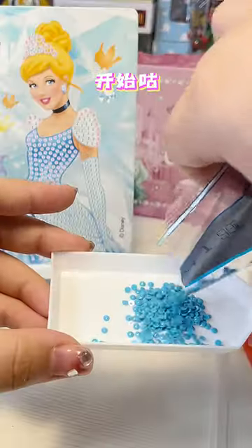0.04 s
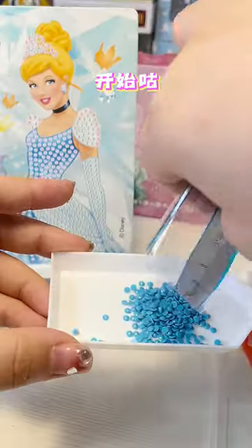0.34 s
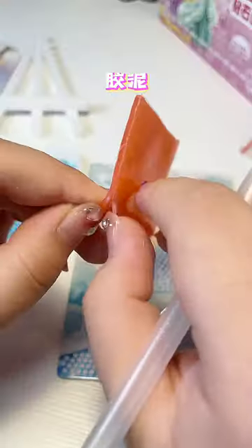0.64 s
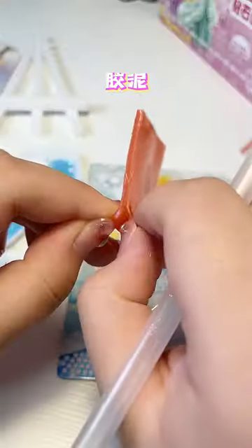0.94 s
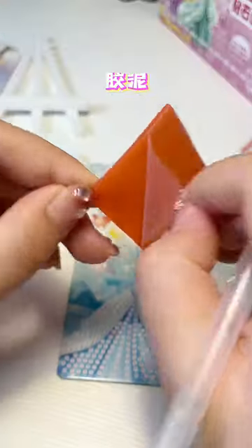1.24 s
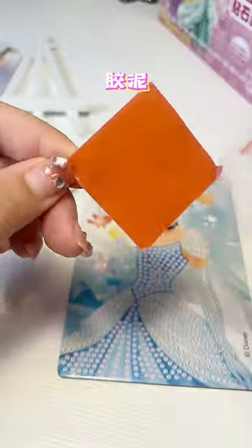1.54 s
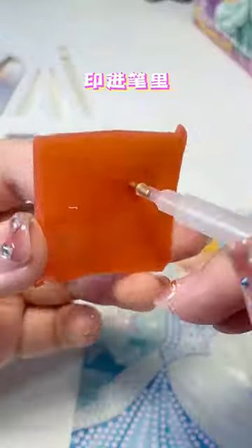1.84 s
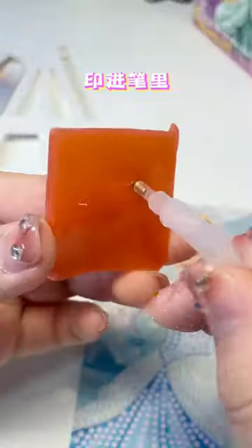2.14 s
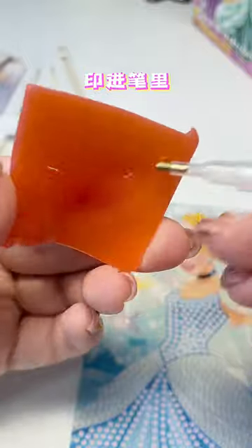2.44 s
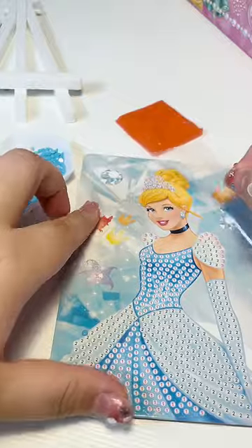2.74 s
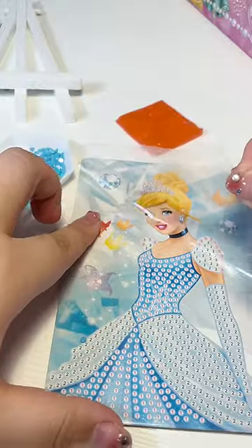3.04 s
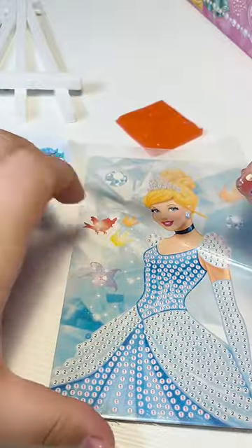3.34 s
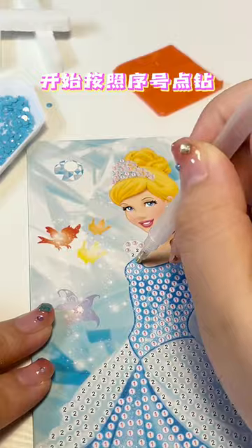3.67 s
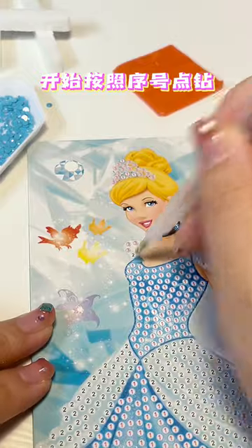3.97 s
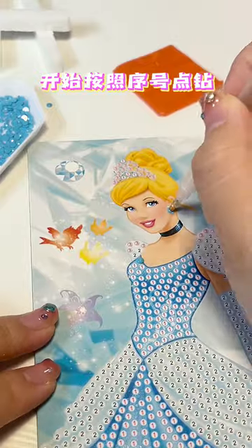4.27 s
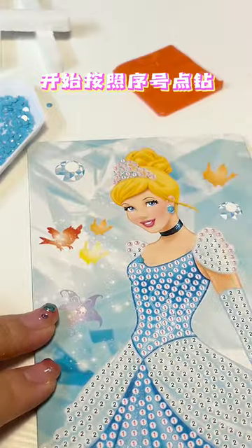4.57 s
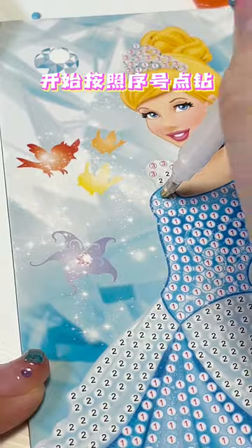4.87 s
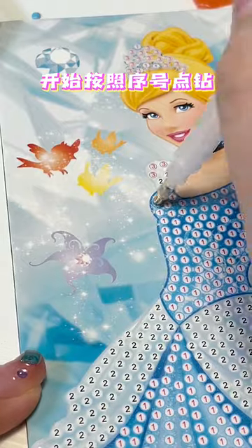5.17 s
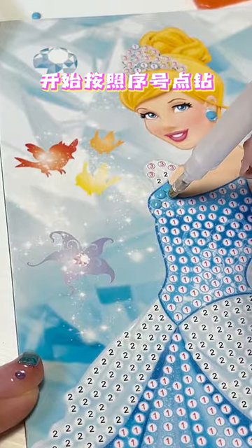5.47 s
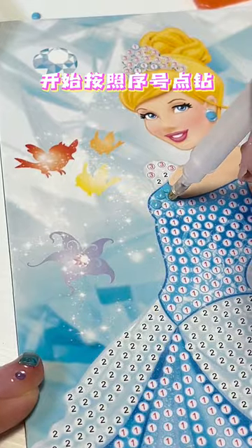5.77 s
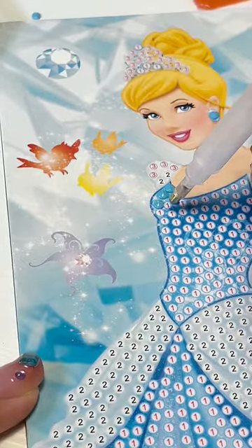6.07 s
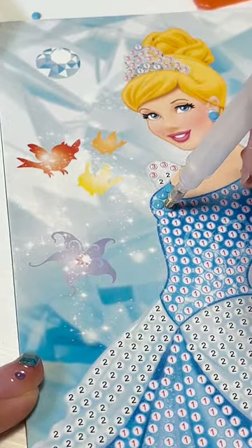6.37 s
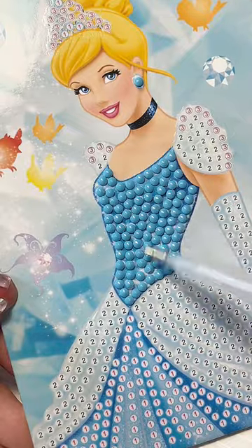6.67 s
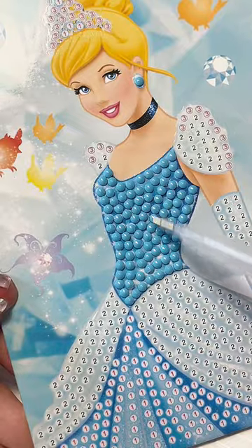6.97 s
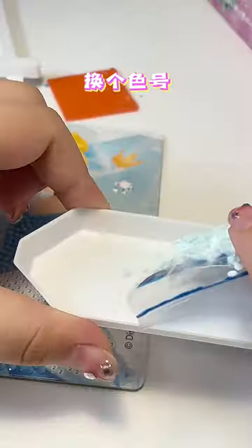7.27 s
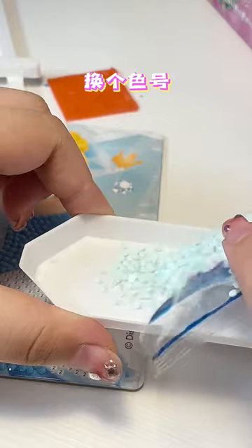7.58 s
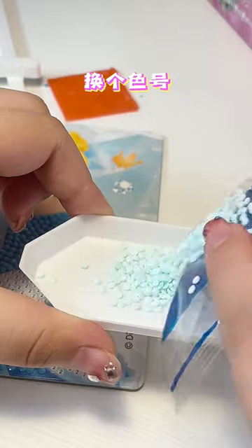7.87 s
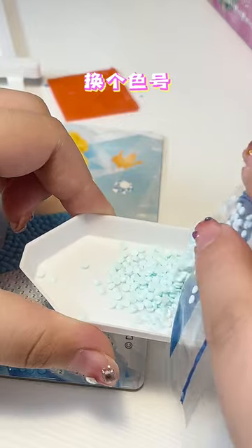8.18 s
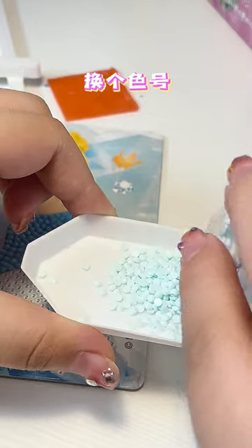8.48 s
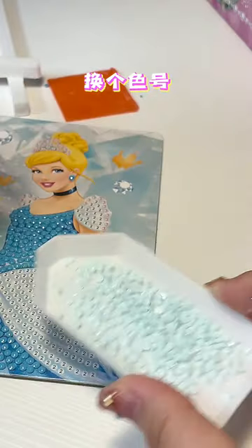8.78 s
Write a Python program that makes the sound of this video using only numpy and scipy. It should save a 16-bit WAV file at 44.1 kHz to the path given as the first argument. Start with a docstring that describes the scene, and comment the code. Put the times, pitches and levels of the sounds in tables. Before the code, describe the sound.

In the first half second a plastic bag slides and rustles off a small plastic tray, which gives a few sharp clicks. Fingernails tick faintly on thin film at about 0.6 seconds and again around 1.5. From 2.6 to 3.4 seconds a cover film peels off a sticky card in crackling snaps, with a soft thump of a hand on the desk. Between 3.9 and 5.9 seconds a pen picks up rhinestones with light, separate clicks. From 6.5 to 7.2 it knocks over the set stones in three quick, hollow strokes. Tiny stones then pour from a rustling bag into the tray in bright, pattering surges, with sharp clicks near 7.5 and 8.4 seconds. From 8.6 to 9 the tray is shaken and the stones rattle level. Everything is close to the microphone, over a small room's low rumble and a faint hum from about 2 seconds.

```python
"""Rhinestones click, pour from a plastic bag and are shaken level, ringing a small plastic tray. Diamond
painting at a desk, close to a phone. First the bag slides off the clicking tray, nails tick on a wax pad's
film, and cover film snaps off a sticky card. A pen picks stones, then skips across the set ones in three quick
strokes; the pour and shake come last. A small room rumbles and hums underneath."""
import sys
import numpy as np
from scipy import signal
from scipy.fft import rfft, irfft, next_fast_len
from scipy.io import wavfile
from scipy.ndimage import uniform_filter1d, minimum_filter1d

SR = 44100
rng = np.random.default_rng(int(sys.argv[2]) if len(sys.argv) > 2 else 0)


def dump(signal):
    """Clip the signal to [-1, 1] and save it as 16-bit WAV at the path in sys.argv[1]."""
    limited = np.clip(np.atleast_2d(signal).T, -1, 1)
    pcm = np.round(limited * 32767).astype(np.int16)
    wavfile.write(sys.argv[1], SR, pcm)


N = 397782
TIME_S = np.arange(N) / SR
HIT_TIME_S = TIME_S[:4096]
SIDE_SIGN = np.array([[1], [-1]])  # left, right

# Levels are relative within each layer.
# surges from the bag, shakes of the tray: t/s, length/s, stone level/dB, tray level/dB
POUR_SURGES = [(7.2, 0.43, -34.5, -25.5), (7.272, 0.096, -36, -25), (7.5, 0.079, -32.5, -23.5),
               (7.67, 0.15, -37, -36.5), (7.84, 0.23, -40, -40.5), (7.99, 0.16, -35.5, -37),
               (8.07, 0.044, -34.5, -45), (8.2, 0.18, -47.5, -42.5), (8.54, 0.0081, -40.5, -39)]
SHAKE_STROKES = [(8.64, 0.13, -31.5, -23), (8.715, 0.023, -34.5, -23.5), (8.8, 0.15, -33, -28.5),
                 (8.99, 0.034, -31.5, -34.5)]
# tray modes: f/Hz, t60/s, falling-stone level/dB, sliding-stone level/dB
TRAY_RESONANCES = [(2254, 0.03, -6.5, -3), (2467, 0.016, 5, 3), (2682, 0.024, 1, 4), (2900, .03, 1, 0.5),
                   (3122, 0.0099, 4, -2.5), (3810, 0.017, 0.5, -1), (5250, .045, -8, -3),
                   (5870, 0.021, 0.5, 0), (6500, 0.011, -13, -5.5)]
# desk, card and pen tip or nail modes: f/Hz, t60/s, level/dB
DESK_RESONANCES = [(231, 0.03, -12.5), (605, 0.025, -23), (1115, 0.0058, 12.5), (1380, 0.004, 5.5),
                   (2170, 0.011, -2), (3496, .012, -15.5)]
CARD_RESONANCES = [(420, 0.024, 13), (615, 0.015, 6), (840, 0.041, -1), (1335, 0.038, 6),
                   (1930, 0.088, 1.5), (2450, 0.03, -1.5), (3010, 0.026, 10), (5240, .018, -1.5),
                   (6570, .018, 6)]
TIP_RESONANCES = [(3330, 0.01, -3), (3690, 0.06, -7), (5380, 0.028, -4.5), (6320, 0.01, 2.5),
                  (8600, 0.008, 4.5)]
# hits on the tray, nails on film, pen picking stones: t/s, level/dB, tilt/(dB/oct), spot f/Hz
TRAY_HITS = [(.1515, -14, -8, 1900), (.2037, 6, 0, 5600), (.2124, -13, 3, 2210), (.2575, -29, -10, 3400),
             (.2644, 4, 0.5, 5600), (.3708, -1, 5, 12900), (.446, -26.5, -4, 2400),
             (7.2505, -12.5, 16, 2905), (7.4343, -24, -1, 3070), (7.4892, -25, 14, 5750),
             (7.994, -34, 0, 2400), (8.3452, -23, -1, 2850), (8.3662, -25, 0, 2730),
             (8.4303, -13.5, -2.5, 4620), (8.4463, 14, 3.5, 3100), (8.4557, -7, -1.5, 4330)]
NAIL_TICKS = [(.6248, -38, -3.5, 6040), (.6301, -43, -7, 2100), (1.3621, -19.5, 5, 13000),
              (1.453, -27, 7, 13500), (1.577, -32.5, -5, 2190), (1.5901, -41, -4.5, 1520),
              (1.6357, -42, 14, 8400)]
PEN_PICKS = [(3.9424, -8.5, -1.5, 7970), (4.4658, -6, -2, 3850), (4.4992, -19, 7, 14000),
             (5.0266, -18.5, 2.5, 3200), (5.3462, -11, 0.5, 8960), (5.8922, -21.5, 2, 8270)]
# pen on set stones: t/s, level/dB
PEN_KNOCKS = [(6.543, 5.5), (6.5659, 1.5), (6.602, -20.5), (6.754, -9), (6.767, -8.5), (6.778, -6.5),
              (6.7998, 5.5), (6.803, 6), (6.819, 1), (6.832, 6), (6.836, -2.5), (6.8499, -0.5),
              (6.8669, -1.5), (6.8745, -4), (6.8844, -12), (7.047, -8), (7.0785, -5.5), (7.0931, -9.5),
              (7.1, 3), (7.106, -6), (7.1161, 3.5), (7.1217, -4), (7.13, 3.5), (7.1415, -5.5),
              (7.161, -2.5)]
# film lets go of the glue: t/s, level/dB, tilt/(dB/oct), t60/s
FILM_SNAPS = [(2.7233, -17.5, -2.5, 0.046), (2.8, -24, -9, 0.076), (2.8833, -17.5, -4, 0.053),
              (2.9628, -21, 10.5, 0.013), (2.9831, 1.5, 6.5, 0.0029), (2.9967, -10.5, 10, 0.013),
              (2.997, -5.5, -3.5, 0.02), (3.004, -2.5, -4, 0.013), (3.0174, -14, -4, 0.023),
              (3.075, -27.5, 9.5, 0.016), (3.139, -5, 3, 0.021), (3.1434, -9, -4, 0.029),
              (3.161, -16.5, -10.5, 0.028), (3.2774, -5, -3, 0.013), (3.281, 5.5, 1, 0.029),
              (3.285, -20, 6.5, 0.06), (3.2899, -9.5, -12.5, 0.017), (3.398, -26.5, -4.5, 0.092)]
# rustling moves: t/s, length/s, level/dB
BAG_SLIPS = [(0, 0.45, -35.5), (.35, 0.073, -47)]
BAG_ROLLS = [(7.29, 0.67, -39), (7.631, 0.007, -26.5), (7.96, 0.27, -35), (8.38, 0.14, -48.5)]  # stones inside the tipped bag
FILM_PULLS = [(2.612, 0.035, -45), (2.72, 0.11, -52), (2.879, 0.022, -35.5), (2.96, 0.14, -48),
              (3.11, 0.071, -44.5), (3.262, 0.039, -39.5)]
GLUE_PEELS = [(2.883, 0.019, -29.5), (2.92, 0.04, -45), (3.19, 0.076, -50.5)]
FINGER_RUBS = [(1.08, 0.29, -78.5), (1.36, 0.26, -72), (4.83, 0.072, -73)]
PEN_STIRS = [(3.945, 0.038, -46.5), (4.47, 0.038, -42.5), (5.03, 0.0614, -55), (5.35, 0.011, -55.5),
             (5.895, 0.02, -61)]
# hand and bag bump card and tray: t/s, level/dB
SOFT_BUMPS = [(4.4, -34), (4.495, -29.5), (5.026, -31), (7.634, -16)]
# hand lands on the desk: t/s, f/Hz, t60/s, level/dB
HAND_THUMPS = [(2.735, 108, .12, -19)]
# source spectra: f/Hz, level/dB
POUR_SPECTRUM = [(200, -34.5), (700, -17.5), (1400, -9), (2200, 6.5), (3300, 6.5), (4600, 2), (6000, 5),
                 (8000, 12.5), (10500, 7.5), (13000, 9.5), (15500, 7)]
SHAKE_SPECTRUM = [(200, -24), (1000, -21.5), (2400, -2.5), (3500, 6.5), (4700, 1.5), (6500, 4),
                  (8500, 10.5), (10500, 4), (12500, 9), (15500, 6)]
TRAY_SPECTRUM = [(150, -50.5), (700, -12.5), (1500, -11.5), (2300, -3.5), (4200, -7), (6000, -10.5),
                 (8200, -0.5), (10000, -7.5), (12500, -6), (15600, -13)]
NAIL_SPECTRUM = [(150, -26.5), (1500, -10.5), (3400, -14), (8000, 1), (10500, 10), (14500, 1), (16000, -13)]
PICK_SPECTRUM = [(150, -35), (700, -4.5), (1500, -8), (2800, -3.5), (3700, -8), (6000, -0.5), (9000, 13),
                 (12500, 5.5), (15500, -13)]
KNOCK_SPECTRUM = [(300, -5), (2000, 15), (4000, 3.5), (7500, 5.5), (12000, 8.5), (15600, -14)]
SNAP_SPECTRUM = [(80, -8.5), (280, -12.5), (420, -2.5), (1400, 3), (2500, 3), (3400, -6), (7500, -6),
                 (9000, -14.5), (12000, -17.5), (15600, -19.5)]
BAG_SPECTRUM = [(200, -10.5), (1600, -10.5), (2100, -5), (3600, -7.5), (8500, 0), (11500, -4),
                (14500, -0.5), (16000, -5.5)]
ROLL_SPECTRUM = [(300, -15), (800, 4.5), (2100, 12.5), (4300, 10.5), (6200, 12.5), (10500, 13),
                 (15000, 7.5)]
FILM_SPECTRUM = [(200, -6.5), (800, 5), (1600, -2), (4000, -2.5), (5800, -3), (11000, -1.5), (14500, -9),
                 (16000, -14)]
RUB_SPECTRUM = [(1000, 2.5), (6000, -1.5), (13000, 9.5), (16000, -1)]
STIR_SPECTRUM = [(300, 4.5), (1600, 0.5), (4600, -1), (13000, 2.5), (16000, -2)]
BUMP_SPECTRUM = [(200, -7), (750, 9.5), (1200, -1.5), (2500, -12), (6000, -52)]
SCATTER_SPECTRUM = [(200, -17.5), (700, 9.5), (2400, -36.5), (4700, 8), (5600, -1.5), (8000, -10.5),
                    (15000, -9)]
RUMBLE_SPECTRUM = [(31, -34.5), (43, 6), (58, -4.5), (76, -5), (95, -3.5), (115, -7.5), (150, -14),
                   (230, -14), (320, -18), (400, -19), (650, -35), (2700, -50), (15000, -53)]
# rumble drift: t/s, level/dB
RUMBLE_DRIFT = [(0.0, -41), (0.7, -43), (3.11, -38.5), (6.33, -40.5), (6.83, -37.5), (9.02, -39)]
# low hum: onset t/s, f/Hz, level/dB
HUM_TONE = (1.95, 113, -42.5)
# phase between microphone ports: f/Hz, left lead/rad
PORT_LEAD = [(20, 0), (4000, 0), (6000, .3), (8000, 2.1), (8800, 3.1), (11500, 3.2), (12700, 4.7),
             (14000, 6), (16000, 6.3)]
# brief level dips: t/s, length/s, level/dB
LEVEL_DIPS = [(6.519, .019, -40), (7.192, .008, -40)]


def stones(gains, spectrum, modes, rate_per_s, spread_db, clump_db, stone_db, tray_db):
    """Resin stones tick against each other; those reaching the tray floor ring it."""
    stone_gain, tray_gain = gains
    impacts = grains(rate_per_s, spread_db, clump_db)
    ticks = band_norm(convolve(chatter(impacts, t60_s=0.004), colour(spectrum)))
    tray = 0
    for mode in modes:
        drive = impacts * rng.standard_normal(N)  # each landing spot drives the mode differently
        tray = tray + undb(mode[2]) * convolve(drive, ring([mode], detune=0.005))
    tray = butter(tray, 2, 1900, "high")  # a small tray radiates no lows
    return undb(stone_db) * stone_gain * ticks + undb(tray_db) * tray_gain * band_norm(tray, (2300, 3300))


def chatter(impacts, t60_s):
    """Each impact dies in a fizz of tiny rebounds."""
    energy = signal.lfilter([1], [1, -undb(-120 / (t60_s * SR))], impacts ** 2 + 1e-18)
    return np.sqrt(energy) * rng.standard_normal(N)


def clicks(rows, spectrum, modes, t60_s, ring_db, gain_db, spot_db=-9):
    """Hard contacts on thin plastic: crack, rattle, ring and the struck spot's pitch."""
    out = np.zeros(N)
    for t_s, level_db, tilt_db_per_oct, spot_hz in rows:
        body = colour(spectrum, tilt_db_per_oct)
        push = contact(t60_s, rise_s=0.000053)
        rattle = undb(-17) * burst(t60_s=0.016)
        crack = unit(convolve(push + rattle, body))
        spot = ring([(spot_hz, 0.006, 0)], detune=0.0039)
        ringing = unit(convolve(crack, ring(modes, detune=0.011)))
        add_hit(out, t_s, level_db + gain_db, crack + undb(ring_db) * ringing + undb(spot_db) * spot)
        graze = convolve(contact(t60_s=0.03, rise_s=0.0033), body)
        add_hit(out, t_s - 0.005, level_db - 16, graze)
    return out


def pen_knocks():
    """The tip drags, then cracks on a stone; the desk knocks hollow."""
    out = np.zeros(N)
    tip = colour(KNOCK_SPECTRUM)
    for t_s, level_db in PEN_KNOCKS:
        crack = unit(convolve(contact(t60_s=0.0043, rise_s=0.000065), tip))
        desk = unit(ring(DESK_RESONANCES, detune=0.025) * swell(HIT_TIME_S, rise_s=0.0005))
        knock = unit(desk + undb(-14 + 0.82 * level_db) * crack)  # harder knocks crack more
        near_echo = unit(convolve(knock, burst(t60_s=0.029)))
        add_hit(out, t_s, level_db, knock + undb(-14) * near_echo)
        drag = convolve(knock, contact(t60_s=0.028, rise_s=0.0044))
        add_hit(out, t_s - 0.004, level_db - 12, drag)
        bright_tail = convolve(burst(t60_s=0.032), tip)
        add_hit(out, t_s, level_db - 21, bright_tail)
    return butter(out, 1, 450, "high")


def film_snaps():
    """Film tears free in jerks, each ringing the card."""
    out = np.zeros(N)
    for t_s, level_db, tilt_db_per_oct, t60_s in FILM_SNAPS:
        crack = unit(convolve(burst(t60_s), colour(SNAP_SPECTRUM, tilt_db_per_oct)))
        card = unit(convolve(crack, ring(CARD_RESONANCES, detune=0.085)))
        add_hit(out, t_s, level_db, crack + undb(-8) * card)
    return out


def rustle(gain, spectrum, rate_per_s, spread_db, clump_db, gain_db):
    """Tiny slips or impacts excite a body."""
    slips = grains(rate_per_s, spread_db, clump_db)
    return undb(gain_db) * gain * band_norm(convolve(slips, colour(spectrum)))


def soft_bumps():
    """Padded contacts: slow push, dull hollow body."""
    out = np.zeros(N)
    for t_s, level_db in SOFT_BUMPS:
        push = contact(t60_s=0.052, rise_s=0.0035)
        add_hit(out, t_s, level_db, convolve(push, colour(BUMP_SPECTRUM)))
    return out


def hand_thump():
    """A soft push swells and dies in the desk top."""
    t_s, f_hz, t60_s, level_db = HAND_THUMPS[0]
    age_s = np.maximum(TIME_S - t_s, 0)
    envelope = 2 * undb(level_db - 60 * age_s / t60_s) * swell(age_s, rise_s=0.0067)
    return envelope * np.sin(2 * np.pi * f_hz * age_s)


def scatter(x, side_db):
    """Short reflections off hands and packaging, opposite at the two ports."""
    response = unit(convolve(burst(t60_s=0.0085), colour(SCATTER_SPECTRUM)))
    return undb(side_db) * convolve(x, response) * SIDE_SIGN


def reflections(x, t60_s, wet_db, width):
    """Diffuse echo of desk and walls, partly different at each port."""
    age_s = TIME_S[:SR // 2]
    decay = undb(-60 * age_s / t60_s) * (age_s > 0.004)
    mid, side = (convolve(x, unit(rng.standard_normal(len(age_s)) * decay)) for _ in range(2))
    return undb(wet_db) * (mid + width * side * SIDE_SIGN)


def room_rumble(waver_db=2.5, side_db=-7):
    """Building rumble; its upper part wavers, its longest waves match on both sides."""
    response = colour(RUMBLE_SPECTRUM, size=16384)
    mid, side = (convolve(rng.standard_normal(N), response) for _ in range(2))
    upper = signal.sosfiltfilt(signal.butter(2, [180, 600], "band", fs=SR, output="sos"), mid)
    mid = mid + upper * (undb(waver_db * wander(rate_hz=14)) - 1)
    side = butter(side, 1, [190, 900], "band")
    level_db = 0.5 + np.interp(TIME_S, *np.transpose(RUMBLE_DRIFT))
    return undb(level_db) * (ports(mid) + undb(side_db) * side * SIDE_SIGN)


def hum(wander_hz=6, waver_db=3, fade_s=0.083):
    """Low hum, unsteady in pitch and level."""
    t_s, f_hz, level_db = HUM_TONE
    phase_rad = 2 * np.pi * np.cumsum(f_hz + wander_hz * wander(rate_hz=30)) / SR
    fade_in = np.clip((TIME_S - t_s) / fade_s, 0, 1)
    return undb(level_db + waver_db * wander(rate_hz=13)) * np.sin(phase_rad) * fade_in


def ports(x, blur_rad=0):
    """Two microphone ports differ in treble phase; a wide source blurs that phase."""
    size = next_fast_len(N + 2048)
    f_hz = np.fft.rfftfreq(size, 1 / SR)
    lead_rad = np.interp(f_hz, *np.transpose(PORT_LEAD))
    jitter_rad = blur_rad * np.interp(f_hz, np.linspace(0, SR / 2, 400), rng.standard_normal(400))
    mid = np.cos(lead_rad / 2)
    side = 1j * np.sin(lead_rad / 2) * np.exp(1j * jitter_rad)
    return irfft(rfft(x, size) * (mid + side * SIDE_SIGN), size)[:, :N]


def level_dips():
    """Gain that drops abruptly for milliseconds."""
    gain = np.ones(N)
    for t_s, length_s, level_db in LEVEL_DIPS:
        gain[(TIME_S > t_s) & (TIME_S < t_s + length_s)] = undb(level_db)
    return uniform_filter1d(gain, size=24)


def gestures(rows, rise_s, fall_db_per_s, sag_db_per_s=0):
    """One gain curve per level column: each move swells, holds or sags, then dies."""
    power = 0
    for t_s, length_s, *levels_db in rows:
        age_s = np.maximum(TIME_S - t_s, 0)
        loss_db = sag_db_per_s * age_s + fall_db_per_s * np.maximum(age_s - length_s, 0)
        shape = swell(age_s, rise_s) * undb(-loss_db)
        power = power + np.outer(undb(levels_db), shape) ** 2
    return np.sqrt(power)


def grains(rate_per_s, spread_db, clump_db):
    """Random impulses; strength varies singly (spread) and in groups (clump)."""
    level_db = spread_db * np.minimum(rng.exponential(size=N), 5) + clump_db * wander(rate_hz=70)
    return (rng.random(N) < rate_per_s / SR) * undb(level_db) * rng.choice([-1, 1], N)


def ring(modes, detune):
    """Decaying modes, detuned by where the blow lands."""
    f_hz, t60_s, level_db = np.transpose(modes)[:, :, None]
    f_hz = f_hz * (1 + detune * rng.standard_normal(f_hz.shape))
    decay = undb(level_db - 60 * HIT_TIME_S / t60_s)
    return unit(np.sum(decay * np.sin(2 * np.pi * f_hz * HIT_TIME_S), 0))


def burst(t60_s):
    """Dying cluster of tiny slips."""
    return unit(rng.standard_normal(len(HIT_TIME_S)) * undb(-60 * HIT_TIME_S / t60_s))


def contact(t60_s, rise_s):
    """Slips that build up, then die."""
    return unit(burst(t60_s) * swell(HIT_TIME_S, rise_s))


def colour(spectrum, tilt_db_per_oct=0, size=2048):
    """Minimum-phase response of a body, tilted above 400 Hz."""
    f_hz, level_db = np.transpose(spectrum)
    octave = np.log2(np.maximum(np.fft.rfftfreq(size, 1 / SR), 1))
    tilt_db = tilt_db_per_oct * np.maximum(octave - np.log2(400), 0)
    low_cut_db = 10 * np.clip(octave - np.log2(f_hz[0]), -2, 0)
    shape_db = np.interp(octave, np.log2(f_hz), level_db) + tilt_db + low_cut_db
    cepstrum = irfft(np.log(undb(shape_db)))
    cepstrum[1:size // 2] *= 2
    cepstrum[size // 2 + 1:] = 0
    return unit(irfft(np.exp(rfft(cepstrum))))


def add_hit(out, t_s, level_db, sound):
    """Add a hit with the energy of 1 ms of tone peaking at level_db."""
    start = max(int(t_s * SR), 0)
    out[start:start + len(sound)] += (undb(level_db) * np.sqrt(SR / 2000) * unit(sound))[:N - start]


def wander(rate_hz):
    """Random curve, spread near 1."""
    knots = rng.standard_normal(4096)
    return 1.2 * np.interp(TIME_S * rate_hz, np.arange(len(knots)), knots)


def band_norm(x, band_hz=(4000, 7000)):
    """Scale to rms 1 in a band."""
    return x / np.std(butter(x, 4, band_hz, "band"))


def unit(x):
    """Scale to unit energy."""
    return x / np.sqrt(np.sum(x ** 2))


def swell(age_s, rise_s):
    return 1 - np.exp(-age_s / rise_s)


def butter(x, order, f_hz, kind):
    return signal.sosfilt(signal.butter(order, f_hz, kind, fs=SR, output="sos"), x)


def convolve(x, response):
    return signal.fftconvolve(x, response)[:len(x)]


def undb(db):
    return 10 ** (np.asarray(db) / 20)


def scene():
    """Stereo mix: handling sounds, echo, rumble, hum."""
    fall_modes = [(f_hz, t60_s, fall_db) for f_hz, t60_s, fall_db, _ in TRAY_RESONANCES]
    slide_modes = [(f_hz, t60_s, slide_db) for f_hz, t60_s, _, slide_db in TRAY_RESONANCES]
    tray = clicks(TRAY_HITS, TRAY_SPECTRUM, fall_modes, t60_s=0.0041, ring_db=-23.5, gain_db=-1)
    nails = clicks(NAIL_TICKS, NAIL_SPECTRUM, TIP_RESONANCES, t60_s=0.0095, ring_db=-14, gain_db=9)
    picks = clicks(PEN_PICKS, PICK_SPECTRUM, TIP_RESONANCES, t60_s=0.0084, ring_db=-14, gain_db=-1,
                   spot_db=-8)

    pouring = gestures(POUR_SURGES, rise_s=0.0077, fall_db_per_s=284.5)
    shaking = gestures(SHAKE_STROKES, rise_s=0.028, fall_db_per_s=244.5)
    sliding, = gestures(BAG_SLIPS, rise_s=0.0013, fall_db_per_s=919, sag_db_per_s=54.5)
    rolling, = gestures(BAG_ROLLS, rise_s=0.0023, fall_db_per_s=229)
    pulling, = gestures(FILM_PULLS, rise_s=0.006, fall_db_per_s=136)
    peeling, = gestures(GLUE_PEELS, rise_s=0.0015, fall_db_per_s=302.5)
    rubbing, = gestures(FINGER_RUBS, rise_s=0.0085, fall_db_per_s=124)
    stirring, = gestures(PEN_STIRS, rise_s=0.0011, fall_db_per_s=186.5)

    pour = stones(pouring, POUR_SPECTRUM, fall_modes, rate_per_s=900,
                  spread_db=2, clump_db=0, stone_db=-1, tray_db=-4.5)
    shake = stones(shaking, SHAKE_SPECTRUM, slide_modes, rate_per_s=2800,
                   spread_db=0, clump_db=-1, stone_db=2, tray_db=-3.5)
    bounces = rustle(pouring[0], POUR_SPECTRUM, rate_per_s=90, spread_db=1.5, clump_db=0, gain_db=-6)
    bag = rustle(sliding, BAG_SPECTRUM, rate_per_s=20000, spread_db=3.5, clump_db=-0.5, gain_db=0.5)
    roll = rustle(rolling, ROLL_SPECTRUM, rate_per_s=3200, spread_db=2.5, clump_db=2.5, gain_db=3.5)
    film = rustle(pulling, FILM_SPECTRUM, rate_per_s=4500, spread_db=2.5, clump_db=2, gain_db=-4.5)
    glue = rustle(peeling, BAG_SPECTRUM, rate_per_s=1500, spread_db=2.5, clump_db=1.6, gain_db=-8)
    rub = rustle(rubbing, RUB_SPECTRUM, rate_per_s=6000, spread_db=0, clump_db=1, gain_db=1.5)
    stir = rustle(stirring, STIR_SPECTRUM, rate_per_s=5800, spread_db=2.5, clump_db=4.2, gain_db=-6.5)
    snaps, knocks = film_snaps(), pen_knocks()

    small_clicks = tray + nails + picks
    hits = small_clicks + snaps + soft_bumps()
    flow = pour + shake + bounces + bag + roll + film + glue + rub + stir
    # small clicks excite the room less than the card does
    echo = reflections(snaps + 0.35 * small_clicks, t60_s=0.087, wet_db=-12.5, width=0.93)
    echo += reflections(butter(knocks, 1, 5000, "low"), t60_s=0.22, wet_db=-17.5, width=0.84)
    handling = ports(flow, blur_rad=1.2) + ports(hits + knocks + hand_thump() + echo)
    scattered = scatter(hits, side_db=-11) + scatter(flow, side_db=-15.5)
    return level_dips() * (handling + scattered + room_rumble() + hum())


def record(dry, ceiling=0.93, top_hz=15600):
    """The phone's fast limiter, then a steep low-pass."""
    needed_gain = np.minimum(1, ceiling / (np.abs(dry).max(axis=0) + 1e-9))
    gain = uniform_filter1d(minimum_filter1d(needed_gain, size=131), size=131)
    return signal.sosfilt(signal.ellip(10, 0.2, 70, top_hz, fs=SR, output="sos"), dry * gain)


dry = scene()
out = record(dry)
dump(out)
```